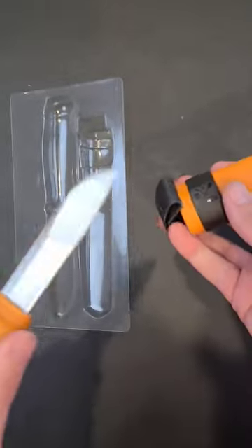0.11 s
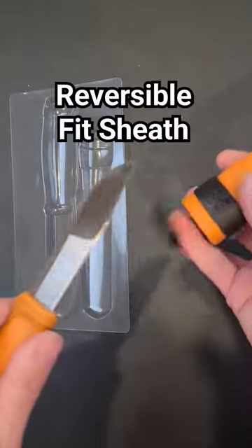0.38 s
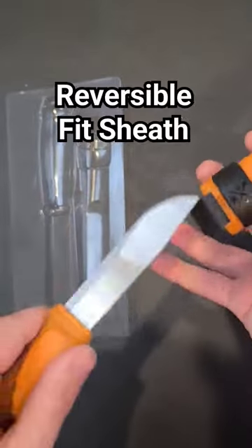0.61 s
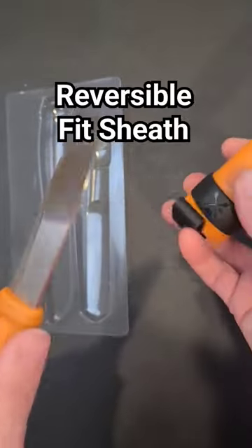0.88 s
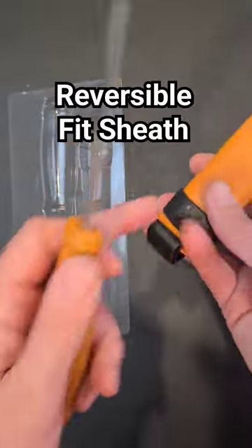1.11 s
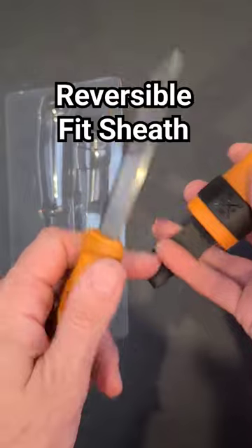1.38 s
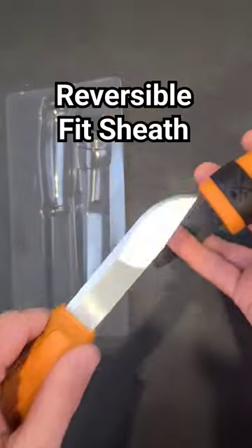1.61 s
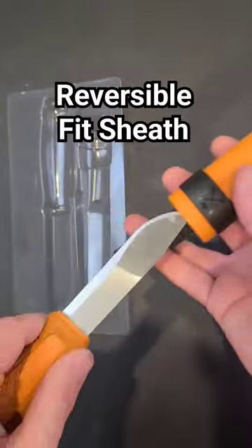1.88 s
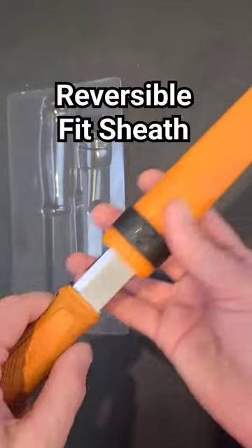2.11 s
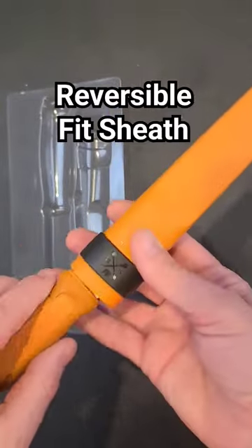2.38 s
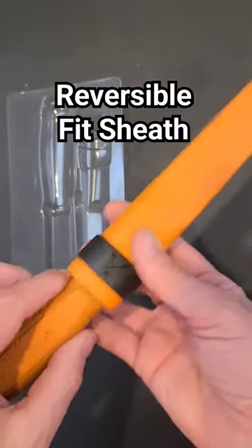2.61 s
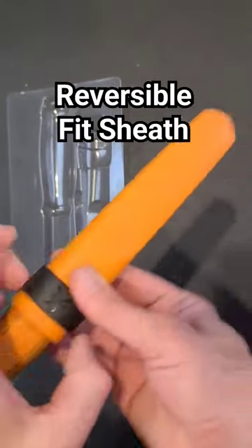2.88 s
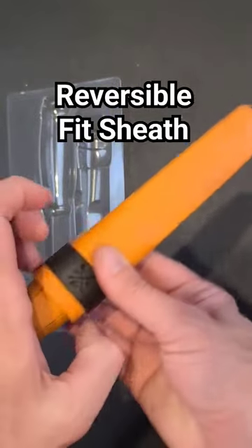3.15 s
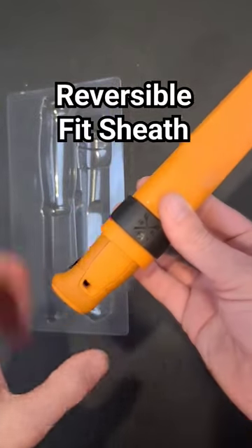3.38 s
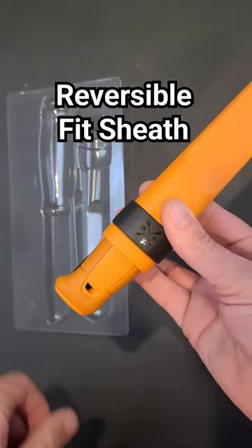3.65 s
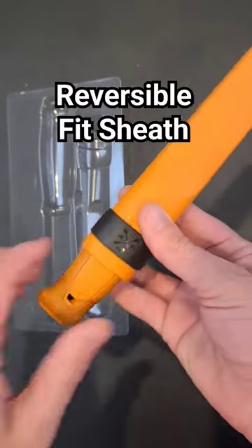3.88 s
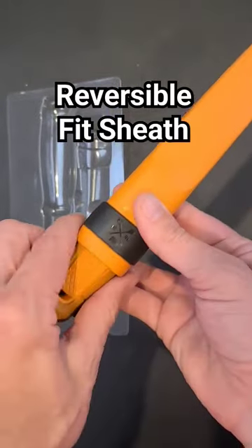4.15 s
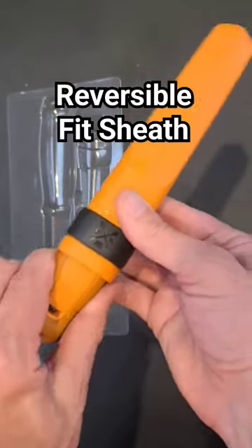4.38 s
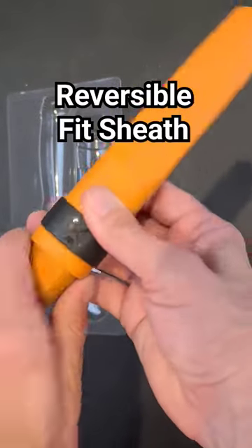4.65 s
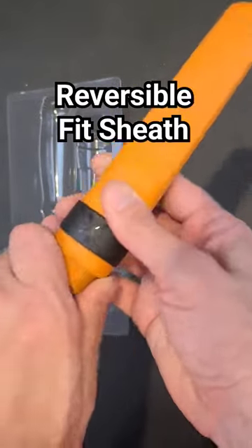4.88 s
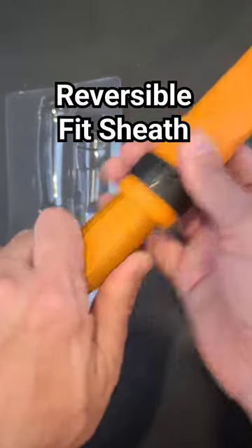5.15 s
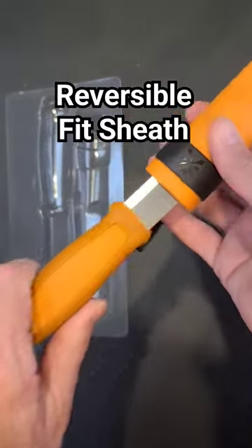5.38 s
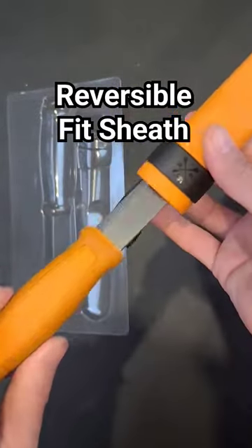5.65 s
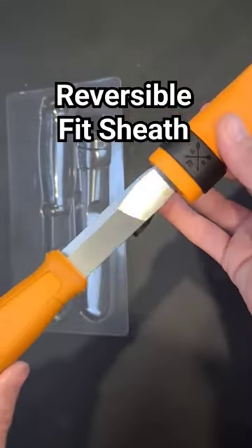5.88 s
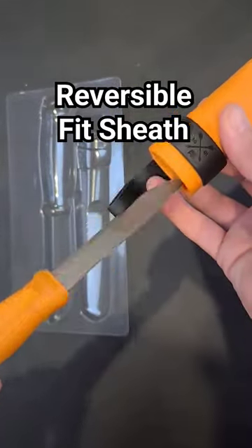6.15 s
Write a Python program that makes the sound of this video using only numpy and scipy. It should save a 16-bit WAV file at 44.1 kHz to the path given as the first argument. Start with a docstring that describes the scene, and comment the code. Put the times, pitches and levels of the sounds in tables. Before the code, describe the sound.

A light plastic tube is tapped once, ringing hollow, with fingers softly brushing it. Then a blade slips in with a short scrape and several strong clacks, their pitch sinking as the tube fills, ending in a tight double click. Quiet handling follows. A hard crack releases the handle, and the blade rubs and ticks its way out. Dry, close stereo sound, short room echoes, faint hum.

```python
"""Knife in a hollow plastic sheath

A knife is slid into a hollow plastic sheath, pushed home and drawn out again, close to two microphones.
Each knock is a decaying sine for the air column, ringing modes for the walls and rim, and a noise tick.
Between knocks, random stick-slip clicks of blade and fingers excite the same walls and hiss; the edge sings.
Dull thumps come from the hands; short noise echoes and a quiet room with a humming fan lie underneath."""
import sys
import numpy as np
from scipy import signal
from scipy.fft import rfft, irfft, next_fast_len
from scipy.io import wavfile

SR = 44100
rng = np.random.default_rng(int(sys.argv[2]) if len(sys.argv) > 2 else 0)


def inscribe(sig):
    """Save sig as 16-bit PCM at rate SR to the path in sys.argv[1].

    A 1-D sig is mono; a 2-D sig holds one channel per row.
    Samples are clipped to [-1, 1] before scaling.
    """
    pcm = np.round(np.clip(np.atleast_2d(sig).T, -1, 1) * 32767)
    wavfile.write(sys.argv[1], SR, pcm.astype(np.int16))


def ratio_of_db(decibels):
    """Turn decibels (scalar or array-like) into linear amplitude factors; 0 dB maps to 1."""
    return 10 ** (np.asarray(decibels, float) / 20)


N = 276066

# knocks on the sheath: [t/s, strength level/dB, crack over strength level/dB,
# air column over strength level/dB, high over low wall modes level/dB]
KNOCKS = [(0.0014, -64, 5, 22, 0), (0.7111, -20.5, 4, 4, 3), (0.7507, -32.5, 0, -6, 1),
          (0.7614, -46, 7, 12, -4), (0.9316, -55, 7, 3, -12), (1.3096, -54, 0, 2, 2),
          (2.1956, -54, -2, 11, 14), (2.361, -35, -9, -6, 3), (2.3872, -22, -21, 2, 14),
          (2.3907, -17, -8, 6, -4), (2.4394, -44, -2, 22, 11), (2.4663, -42, -9, 10, 6),
          (2.475, -50, -3, 7, 8), (2.5623, -35, -8, 7, 1), (2.6808, -31, -19, -3, -4),
          (2.6868, -14.5, -17, 0, 4), (2.8974, -25, 0, -2, -2), (2.9706, -27, -3, -4, -1),
          (3.0069, -48, 10, -3, 4), (3.0204, -44, -3, 11, 16), (3.0574, -29, -3, -3, 5),
          (3.1355, -26, -2, 3, -5), (3.1379, -28, 6, 1, -12), (3.3593, -60, 15, 0, -14),
          (5.022, -57, 15, -4, -5), (5.1205, -13.5, 6, -11, 3), (5.2509, -16.5, -15, -29, -10),
          (5.2553, -29, -14, 4, -23), (5.3223, -17, -6, -7, -3), (5.3414, -44, 8, -17, -14),
          (5.4271, -35, -5, -4, -9), (5.5564, -52, -9, -3, 0), (5.6175, -61, 8, -12, -3),
          (5.6944, -47, -16, -13, -1), (5.7523, -46, -4, -17, 5), (5.7902, -38, 5, 18, 5),
          (5.9979, -43, -8, -18, -18), (6.0207, -44, -3, -5, -22)]
# modes of sheath and knife: [f/Hz, ring time t60/s, then relative level/dB with the sheath held lightly,
# gripped at the collar, knife seated, sheath empty]
WALL_MODES = [(1029, 0.025, -9, 6, 5, 3.5), (1083, 0.016, -4, 4.5, 4, -10),
              (1300, 0.025, -5.5, 0, -0.5, -18), (1519, 0.036, 3.5, 0.5, -5.5, -3.5),
              (1581, 0.043, 3.5, -8, -15.5, -14), (1802, 0.04, -6.5, 2.5, -5.5, -3),
              (1997, 0.043, -12.5, -2, -13, -4.5), (2155, 0.021, -4, -12, -5, -7),
              (2345, 0.035, -1, 2, -5, -29), (2513, 0.02, 6, -13, -9.5, -12), (2750, 0.035, -5, -2, -1, -2),
              (2977, 0.026, 1.5, -2.5, 0.5, 0), (3280, 0.032, -1, -2, -7.5, -5.5),
              (3613, 0.017, -3.5, -9.5, 1.5, -15), (4260, 0.0084, -3.5, 8.5, -1.5, -1),
              (4745, 0.025, -1.5, -1.5, -6, -7), (5220, .03, 0.5, -8, -7, -15),
              (5775, 0.028, 1, -6.5, -8, -1.5), (6330, 0.023, -3, 2, -7, -5.5),
              (7400, 0.01, -22, -26, -25, -16)]
# how the sheath is held: [from t/s, 0 held lightly / 1 gripped at the collar / 2 knife seated / 3 empty,
# level/dB by which rubbing favours the high wall modes]
HOLD = [(0, 3, 0), (.85, 0, 7), (2.35, 1, 0), (2.885, 2, 0), (5.2, 0, -3.5)]
HIGH_WALLS_FROM_HZ, RIM_FROM_HZ = 2000, 3800
AIR_TAIL_T60_S = 0.14      # ring time of the air tone's slow tail, partly the room


def rms_one(x):
    """Scales a signal to rms 1."""
    return x / np.sqrt(np.mean(x ** 2) + 1e-20)


def at_hz(points, hz):
    """Reads a (Hz, value) curve along a logarithmic frequency axis."""
    points_hz, values = np.array(points).T
    return np.interp(np.log(hz + 1), np.log(points_hz), values)


def coloured(x, gain):
    """Filters by a gain given as a function of Hz."""
    size = next_fast_len(N + SR // 10)
    hz = np.arange(size // 2 + 1) * SR / size
    return irfft(rfft(x, size) * gain(hz), size)[..., :N]


def ring(clicks, hz, t60):
    """A two-pole resonator: a unit click sets a dying sine of starting height near 1 ringing."""
    r, w = ratio_of_db(-60 / (t60 * SR)), 2 * np.pi * hz / SR
    return signal.lfilter([0, np.sin(w)], [1, -2 * r * np.cos(w), r * r], clicks + 1e-18)


def clicks_at(s, sizes):
    """Single-sample clicks at times s."""
    out = np.zeros(N)
    np.add.at(out, np.round(np.asarray(s) * SR).astype(int), sizes)
    return out


def grains(per_s, spread_db):
    """Random stick-slip clicks of uneven size and either sign; rms 1."""
    sizes = ratio_of_db(spread_db * np.minimum(rng.exponential(1, N), 4)) * rng.choice([-1, 1], N)
    return rms_one(sizes * (rng.random(N) < per_s / SR))


def by_hold(values, s):
    """Picks from one value per way of holding, since the grip decides how strongly a part sounds at times s."""
    since, hold, _ = np.transpose(HOLD)
    return np.array(values)[hold[np.searchsorted(since, s, "right") - 1].astype(int)]


def air_column(s, level_db):
    """A soft push swells each air tone within about a millisecond, then it dies in two stages."""
    # the pitch sinks as the knife fills the sheath and recovers as it empties: [t/s, f/Hz]
    air_pitch = [(0, 830), (2.4, 830), (2.44, 803), (2.69, 796), (2.9, 739), (2.97, 680), (3.06, 600),
                 (3.13, 700), (3.15, 620), (5.12, 605), (5.25, 640), (5.33, 696), (5.43, 830), (6.26, 824)]
    out = np.zeros(N)
    t = np.arange(int(.2 * SR)) / SR
    for at, hz, db in zip(s, np.interp(s, *np.transpose(air_pitch)), level_db):
        damped_by_hand = ratio_of_db(-60 * t / 0.041)
        slow_tail = ratio_of_db(-14.5 - 60 * t / AIR_TAIL_T60_S)
        swell = 1 - np.exp(-t / 0.00094)
        tone = ratio_of_db(db) * swell * (damped_by_hand + slow_tail) * np.sin(2 * np.pi * hz * t)
        start = round((at + 0.0011) * SR)
        out[start:start + len(t)] += tone[:N - start]
    return out


def struck_walls(s, low_db, high_db, crack_db):
    """Each mode of walls and rim takes its own share of the blow; a faint grainy noise swells before it."""
    held_damping = 0.77      # share of the ring time left while the striking parts touch
    share_db = 0.5 * rng.standard_normal((len(s), len(WALL_MODES)))
    late_s = .0015 + rng.uniform(0, .0003, share_db.shape)      # the blow reaches each part a little later
    walls = np.zeros(N)
    for k, (hz, t60, *levels_db) in enumerate(WALL_MODES):
        if hz > RIM_FROM_HZ:
            blow_db = crack_db
        else:
            blow_db = high_db if hz > HIGH_WALLS_FROM_HZ else low_db
        sizes = ratio_of_db(blow_db - 3.5 + by_hold(levels_db, s) + share_db[:, k])
        walls += (-1) ** k * ring(clicks_at(s + late_s[:, k], sizes), hz, held_damping * t60)
    # a faint grainy noise swells for some milliseconds before each blow
    lead_s = np.arange(500)[::-1] / SR
    lead_in = ratio_of_db(-33.5 - 60 * lead_s / 0.036) * grains(4000, spread_db=2.0)[:500]
    return walls + signal.fftconvolve(walls, lead_in)[499:]


def contact_tick(s, crack_db):
    """The dry tick of contact: a short dying burst of noise, band-limited to 3.5-13 kHz."""
    t = np.arange(600) / SR
    burst = ratio_of_db(-60 * t / 0.024) * rng.standard_normal(600)
    tick = signal.fftconvolve(clicks_at(s + 0.0016, ratio_of_db(crack_db - 11)), burst)[:N]
    return signal.sosfilt(signal.butter(2, [3500, 13000], "band", fs=SR, output="sos"), tick)


def knocks():
    """Each blow drives the air column, the modes of walls and rim, and a tick of contact."""
    s, strength_db, crack_db, air_db, tilt_db = np.transpose(KNOCKS)
    crack_db = strength_db + crack_db
    low_db, high_db = strength_db - tilt_db / 2, strength_db + tilt_db / 2
    air = air_column(s, strength_db + air_db)
    return air + struck_walls(s, low_db, high_db, crack_db) + contact_tick(s, crack_db)


def stroke_gains():
    """Pressure rises to a peak and falls away, stuttering; each knock adds a dying slip. Powers add."""
    # rubbing strokes: [t/s of most pressure, scrape of blade on walls level/dB, t/s to rise 20 dB,
    # t/s to fall 20 dB, skin hiss over scrape level/dB]
    strokes = [(0.0, -62, .01, .2, -6), (0.45, -62, .08, .05, -3), (0.63, -73, .15, .15, 5),
               (0.758, -50, .1, .07, 0), (0.89, -66, .08, .09, -8), (1.062, -64, .048, .09, 0),
               (1.21, -58, .04, .025, -4), (1.384, -59, .018, .035, -8), (1.418, -42, .015, .022, -9),
               (1.55, -72, .06, .08, 4), (2.2, -60, .004, .4, -8), (2.285, -51, .04, .3, -10),
               (2.384, -47, .11, .004, -11), (2.59, -54, .012, .06, -9), (2.945, -50, .012, .05, -4),
               (2.99, -46, .012, .11, -7), (3.052, -33.5, .04, .018, -7), (3.95, -76, .09, .09, 4),
               (4.15, -76, .09, .09, 4), (4.356, -62, .03, .16, -5), (4.79, -74, .05, .05, 4),
               (4.878, -61, .15, .07, -6), (5.022, -65, .021, .047, 1), (5.116, -47, .016, .004, -1),
               (5.245, -50, .021, .004, -14), (5.318, -34, .021, .004, -12), (5.437, -53.5, .11, .036, -7),
               (5.555, -47, .035, .021, -10), (5.67, -56, .03, .04, -13), (5.785, -55, .09, .004, -3),
               (6.0, -53, .015, .05, -19), (6.035, -49, .04, .025, -12), (6.175, -56, .04, .03, -10),
               (6.252, -48.5, .03, .11, -14)]
    hop = 32      # samples between control points
    t = np.arange(0, N + hop, hop) / SR
    s, db, rise_s, fall_s, hiss_db = np.transpose(strokes)[..., None]
    stroke_db = db - 20 * np.where(t < s, (s - t) / rise_s, (t - s) / fall_s)

    # after a knock the loose parts slip on until they settle; a harder crack leaves more hiss
    s, db, crack_db = np.transpose(KNOCKS)[:3, :, None]
    since = np.where(t < s, np.inf, t - s)
    settle_db = db - 20 - 60 * since / .22
    settle_hiss_db = db - 28 + .5 * crack_db - 60 * since / .2

    # the grip stutters: low-passed noise sways the level
    stutter_hz, stutter_db = 60, 1.6
    keep = np.exp(-2 * np.pi * stutter_hz * hop / SR)
    sway = signal.lfilter([1], [1, -2 * keep, keep ** 2], rng.standard_normal(len(t)))
    stutter = rms_one(ratio_of_db(stutter_db * rms_one(sway)))

    def summed(*levels_db):
        gain = stutter * np.sqrt(np.sum(ratio_of_db(2 * np.vstack(levels_db)), axis=0))
        return np.interp(np.arange(N) / SR, t, gain)

    return summed(stroke_db, settle_db), summed(stroke_db + hiss_db, settle_hiss_db)


def rubbing():
    """Coarse slips excite air column and walls, fine slips the bright rim modes and a broad grainy hiss."""
    # colour of the skin hiss: [f/Hz, relative level/dB per Hz]
    skin_colour = [(880, -26), (1500, -16), (1960, -15), (2690, -9), (3000, -13), (4330, -4), (6000, -8),
                   (7170, -17), (14800, -26), (16000, -36.5)]
    scrape, hiss = stroke_gains()
    s = np.arange(N) / SR
    coarse = grains(1100, spread_db=5.5) * scrape
    fine = grains(2500, spread_db=4.0)
    # the air column at a fixed pitch, with one level in dB for each way of holding
    out = ratio_of_db(by_hold([-43, -28.5, -38, -23], s)) * ring(coarse, 820, AIR_TAIL_T60_S)

    since, _, tilt_db = np.transpose(HOLD)
    tilt = ratio_of_db(tilt_db / 2)[np.searchsorted(since, s, "right") - 1]
    low, high = coarse / tilt, coarse * tilt
    for k, (hz, t60, *levels_db) in enumerate(WALL_MODES):
        if hz > RIM_FROM_HZ:
            slips = ratio_of_db(-23) * fine * hiss
        else:
            slips = ratio_of_db(-24.5) * (high if hz > HIGH_WALLS_FROM_HZ else low)
        out += (-1) ** k * ring(slips * by_hold(ratio_of_db(levels_db), s), hz, t60)

    skin = rms_one(coloured(fine, lambda hz: ratio_of_db(at_hz(skin_colour, hz))))
    return out + ratio_of_db(5.5) * hiss * skin


def edge():
    """The blade edge sings as it slides in: a band of grainy noise carried on a gliding pitch."""
    # the pitch mostly climbs as the free length shortens: [t/s, f/Hz, level/dB]
    edge_glide = [(2.19, 4200, -76), (2.21, 4300, -59), (2.249, 4650, -67), (2.27, 4600, -65),
                  (2.33, 4670, -53), (2.37, 4450, -58), (2.385, 4510, -85)]
    s, hz, db = np.transpose(edge_glide)
    t = np.arange(N) / SR
    band = signal.sosfilt(signal.butter(2, 300, fs=SR, output="sos"), grains(1000, spread_db=3.0))
    carrier = np.sin(2 * np.pi * np.cumsum(np.interp(t, s, hz)) / SR)
    return ratio_of_db(np.interp(t, s, db, left=-200, right=-200)) * rms_one(band * carrier)


def thumps():
    """Dull low modes of hands and handle, each set ringing by one click."""
    # hands jolt when the handle seats or lets go: [t/s, f/Hz, level/dB, ring time t60/s]
    jolts = [(3.14, 225, -31, .1), (3.139, 400, -26.5, 0.017), (5.121, 420, -19.5, 0.046),
             (5.124, 311, -34.5, 0.034)]
    return sum(ring(clicks_at([s], ratio_of_db(db)), hz, t60) for s, hz, db, t60 in jolts)


def at_ports(sheath):
    """Each place gives the two microphones its own level and phase difference, changing with pitch."""
    # the sheath is moved about before the microphones: [from t/s, to t/s] of each place
    places = [(0, 1.9), (1.9, 2.89), (2.89, 5.24), (5.24, 6.3)]
    # for each place: [f/Hz, left minus right level/dB]
    place_balance = [
        [(60, -5), (380, -6), (2380, 4), (15000, 6)],
        [(60, -0.5), (380, -4), (2380, 5), (15000, 2)],
        [(60, 0), (380, -3), (2380, 3.5), (15000, 2)],
        [(60, -1.5), (380, -3.5), (2380, 7), (15000, 4)],
    ]
    # for each place: [f/Hz, phase/rad by which left leads]
    place_phase = [
        [(1000, 1.26), (1450, 2.4), (2600, -0.1), (3500, -2.5), (7000, -2), (9000, -1.5)],
        [(1000, 0.81), (1700, 1.5), (2900, 1.2), (3800, 1.44), (5200, 1), (6700, 2.5), (8000, -1)],
        [(1200, 0.61), (1700, 1.5), (2400, -0.7), (3700, -2), (5200, -1), (6300, -2.5), (7200, 1.5), (9000, 2)],
        [(900, 0.46), (1500, 1.05), (2600, -1), (3500, -5), (6500, -2), (10500, -2)],
    ]
    half = np.array([[.5], [-.5]])      # half the difference to each side
    s, out = np.arange(N) / SR, 0
    for (start, end), balance, phase in zip(places, place_balance, place_phase):
        here = sheath * ((s >= start) & (s < end))
        out = out + coloured(here, lambda hz: ratio_of_db(half * at_hz(balance, hz))
                             * np.exp(1j * half * at_hz(phase, hz)))
    return out


def room(x):
    """Echoes as noise dying away, duller than the source, unrelated at the two microphones."""
    t60_s, wall_cut_hz = 0.27, 7800
    t = np.arange(int(.4 * SR)) / SR
    onset = np.clip(t / 0.002, 0, 1)
    tail = rng.standard_normal((2, len(t))) * ratio_of_db(-60 * t / t60_s) * onset
    tail = signal.sosfilt(signal.butter(1, wall_cut_hz, fs=SR, output="sos"), tail)
    tail = tail / np.sqrt(np.sum(tail ** 2) / 2)
    return signal.fftconvolve(x[None], tail, axes=1)[:, :N]


def room_tone():
    """Steady air noise, alike left and right in the bass, with narrow bands of noise as fan hums."""
    # colour of the air noise: [f/Hz, relative level/dB per Hz]
    air_colour = [(12, -50.5), (20, -17.5), (60, -6), (116, -6.5), (193, -10), (228, -7), (262, -12.5),
                  (377, -7), (410, -11), (873, -21.5), (1290, -24), (3500, -37), (5600, -39.5), (6910, -53),
                  (14300, -42), (16000, -59.5)]
    # fan hums: [f/Hz, bandwidth f/Hz, rms level/dB ahead of the left-right balance]
    fan_hums = [(52, 14, -65), (76, 15, -62.5), (115.9, 12, -58.5), (232.8, 6.6, -62), (400, 120, -65),
                (630.4, 21, -70)]
    # [f/Hz, left-right likeness from -1 to 1]
    likeness = [(60, 0.9), (150, 0.99), (380, 0.6), (950, -0.059), (2380, -0.18), (5980, 0.58),
                (15000, -0.74)]
    # [f/Hz, left minus right level/dB]
    tone_balance = [(60, -3), (180, 2), (550, -0.5), (1650, 0), (4970, 5.5), (15000, -1)]
    mid, side, hum = rng.standard_normal((3, N))

    def alike(hz):
        return np.clip(at_hz(likeness, hz), -1, 1)

    def colour(hz):
        return ratio_of_db(at_hz(air_colour, hz))

    mid = coloured(mid, lambda hz: colour(hz) * np.sqrt(1 + alike(hz)))
    side = coloured(side, lambda hz: colour(hz) * np.sqrt(1 - alike(hz)))
    air = ratio_of_db(-52) * rms_one(np.array([mid + side, mid - side]))
    for hz, width_hz, db in fan_hums:
        air += ratio_of_db(db) * rms_one(coloured(hum, lambda f: 1 / (1 + ((f - hz) / width_hz * 2) ** 2)))
    return coloured(air, lambda hz: ratio_of_db(at_hz(tone_balance, hz) * [[.5], [-.5]]))


def scene():
    """The sheath at the two microphones, its echoes and the room tone."""
    small_body = signal.butter(2, 240, "high", fs=SR, output="sos")      # a small body sends out no bass
    sheath = signal.sosfilt(small_body, knocks() + rubbing() + edge()) + thumps()
    return at_ports(sheath) + ratio_of_db(-15.5) * room(sheath) + room_tone()


def top_cut(x):
    """Nothing passes above the cut-off."""
    return signal.sosfilt(signal.butter(12, 16470, fs=SR, output="sos"), x)


def record(dry):
    """The microphones add their own faint treble hiss; a steep low-pass ends the band near 16 kHz."""
    treble = signal.butter(2, 9000, "high", fs=SR, output="sos")
    hiss = ratio_of_db(-84) * signal.sosfilt(treble, rng.standard_normal(dry.shape))
    heard = signal.sosfilt(signal.cheby2(10, 40, 16200, fs=SR, output="sos"), dry + hiss)
    return top_cut(heard)


dry = scene()
out = record(dry)
inscribe(out)
```